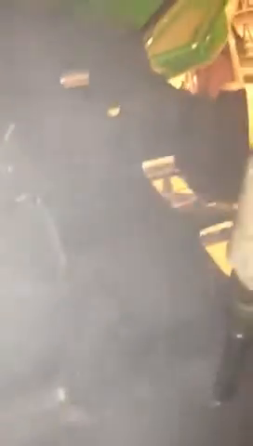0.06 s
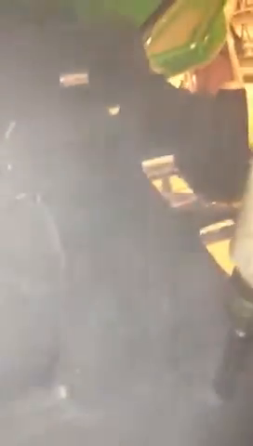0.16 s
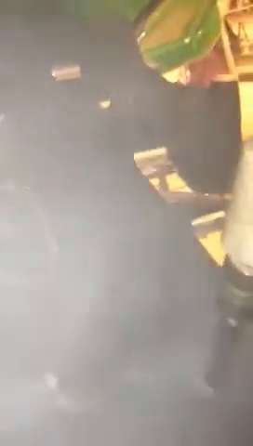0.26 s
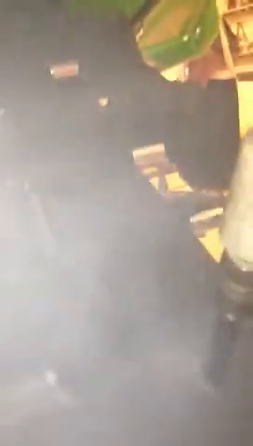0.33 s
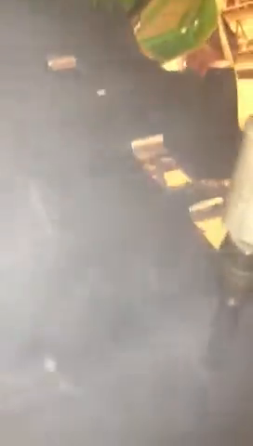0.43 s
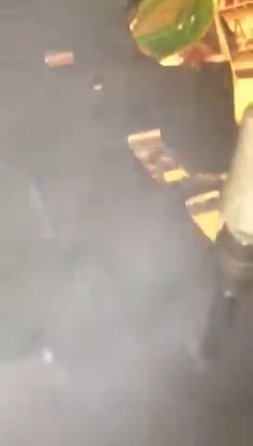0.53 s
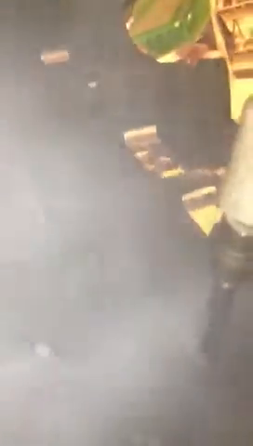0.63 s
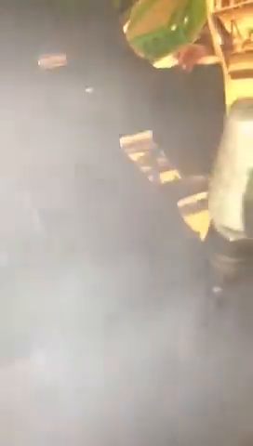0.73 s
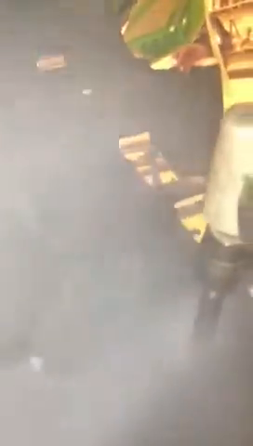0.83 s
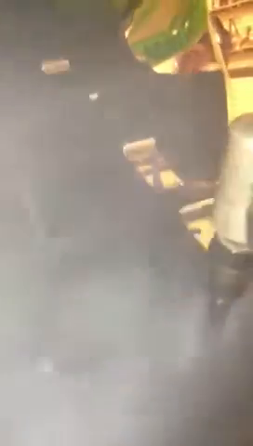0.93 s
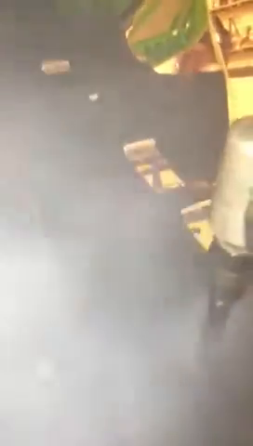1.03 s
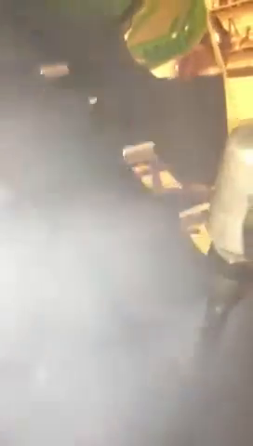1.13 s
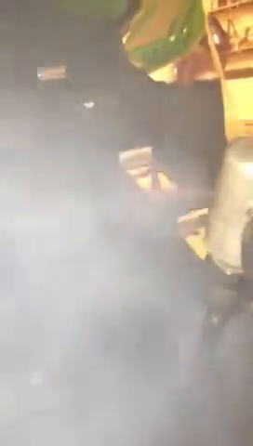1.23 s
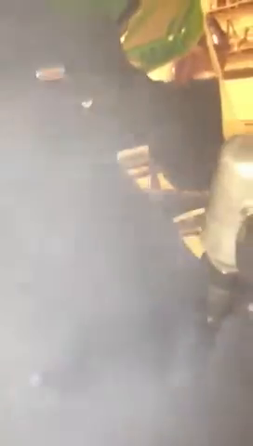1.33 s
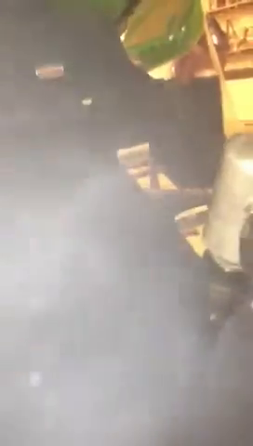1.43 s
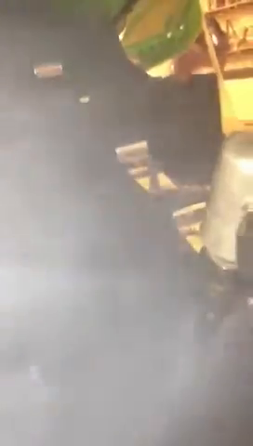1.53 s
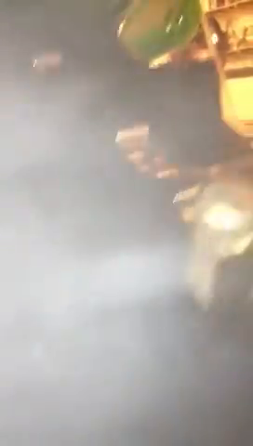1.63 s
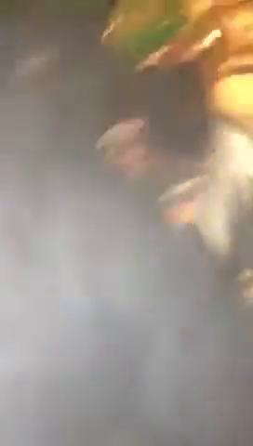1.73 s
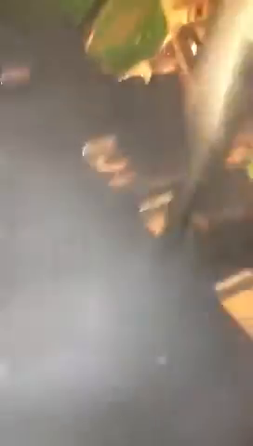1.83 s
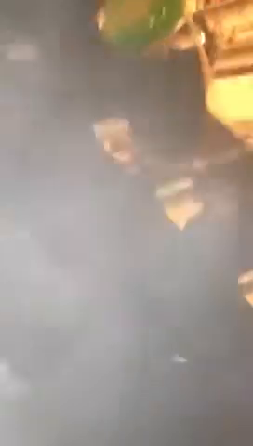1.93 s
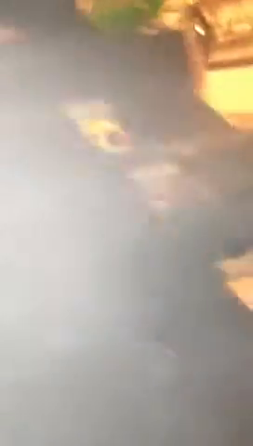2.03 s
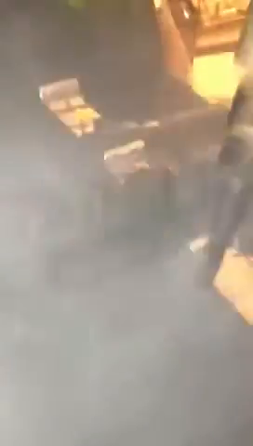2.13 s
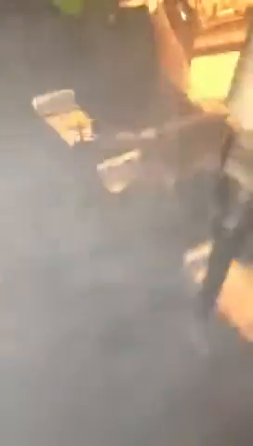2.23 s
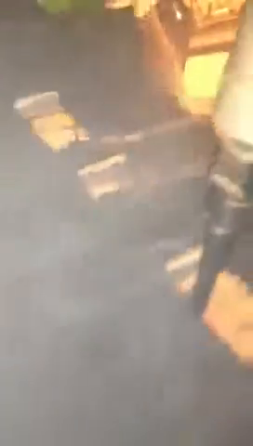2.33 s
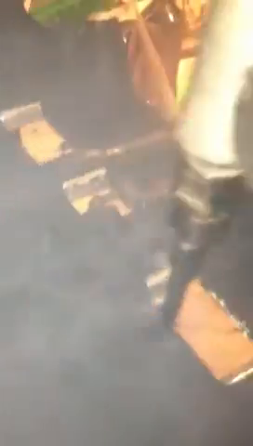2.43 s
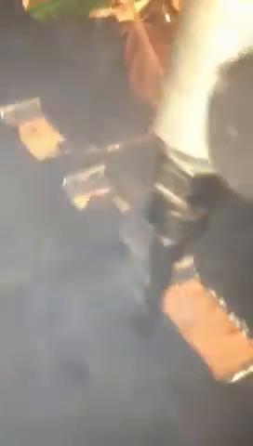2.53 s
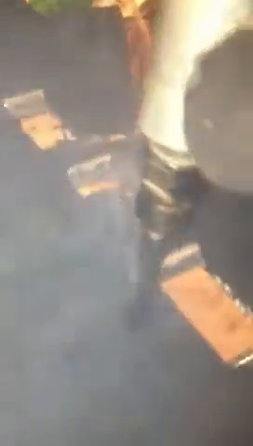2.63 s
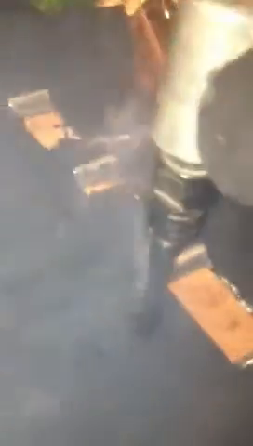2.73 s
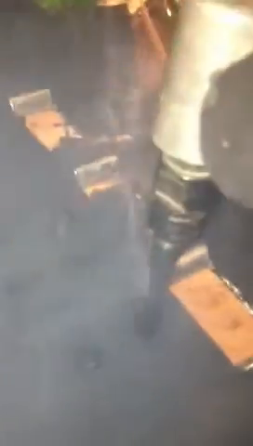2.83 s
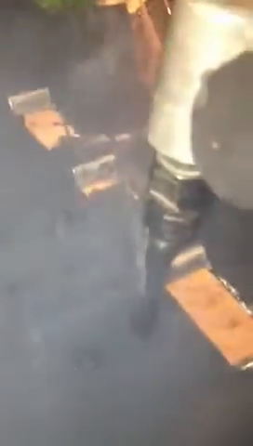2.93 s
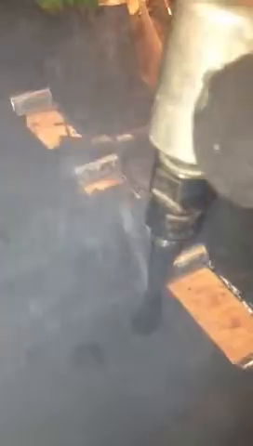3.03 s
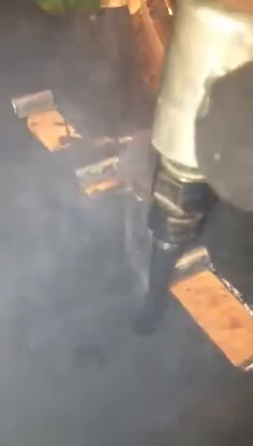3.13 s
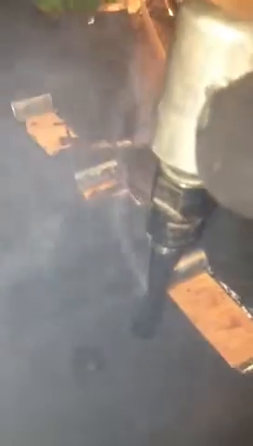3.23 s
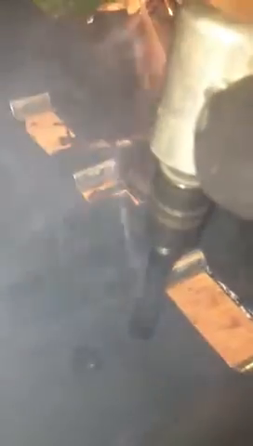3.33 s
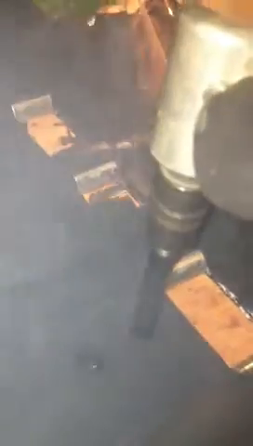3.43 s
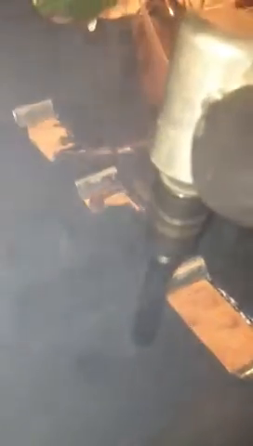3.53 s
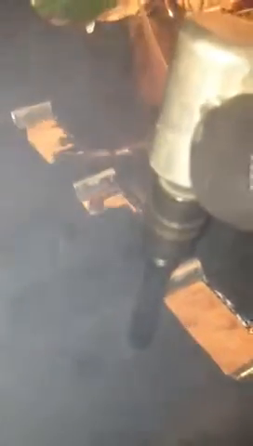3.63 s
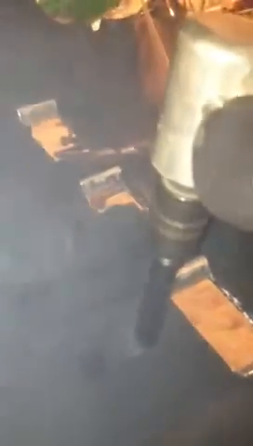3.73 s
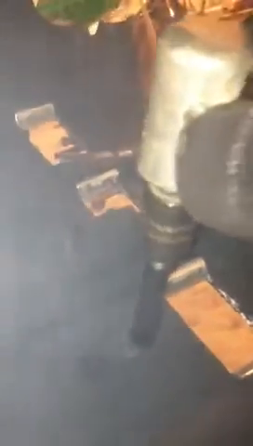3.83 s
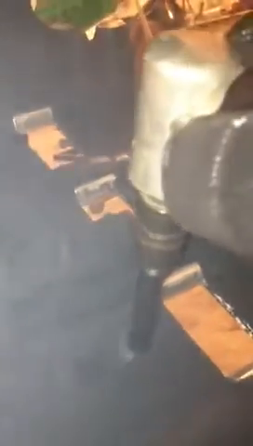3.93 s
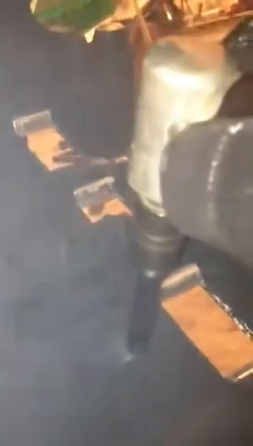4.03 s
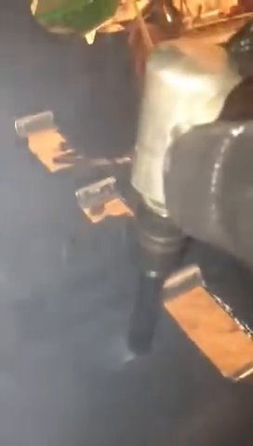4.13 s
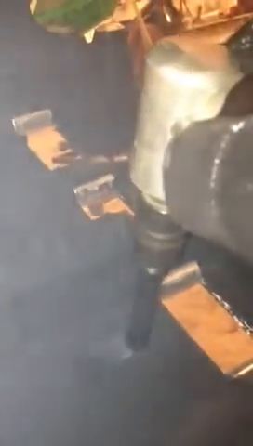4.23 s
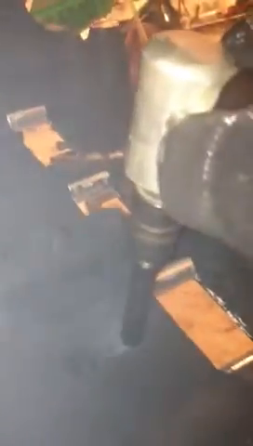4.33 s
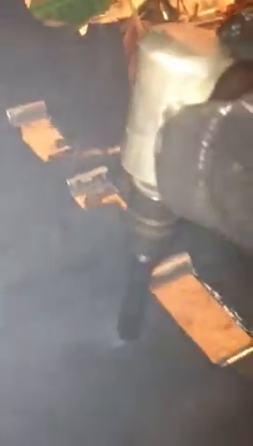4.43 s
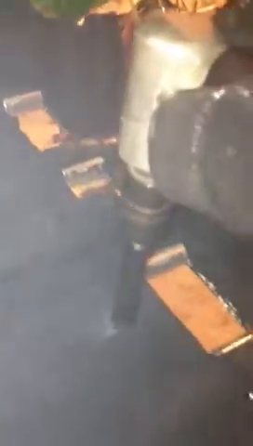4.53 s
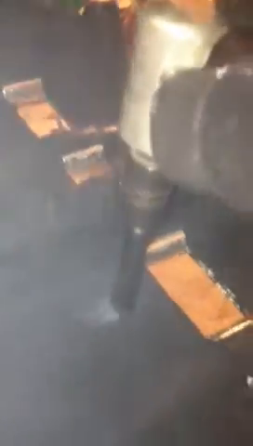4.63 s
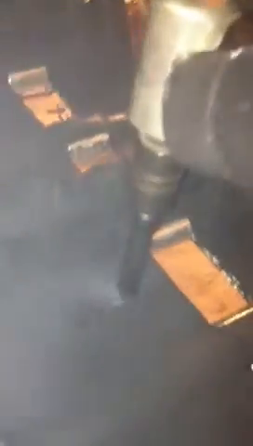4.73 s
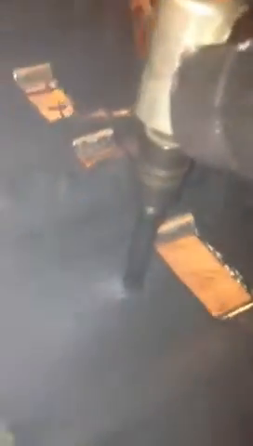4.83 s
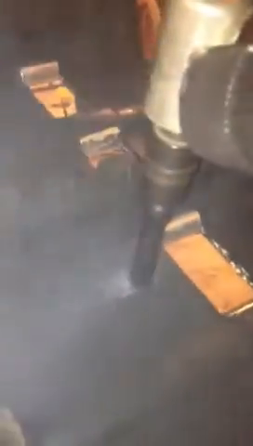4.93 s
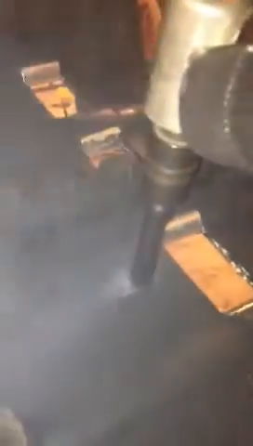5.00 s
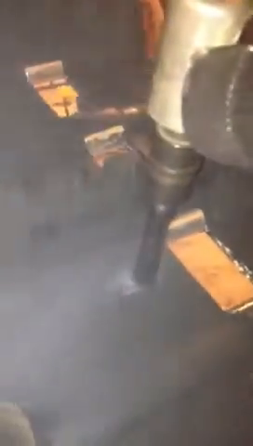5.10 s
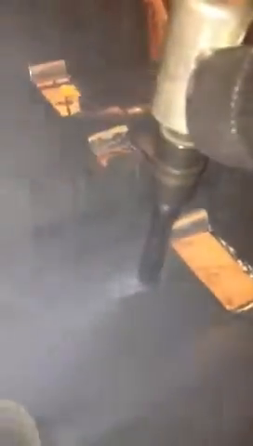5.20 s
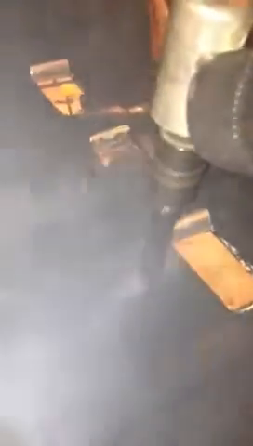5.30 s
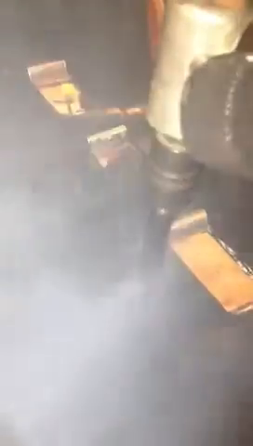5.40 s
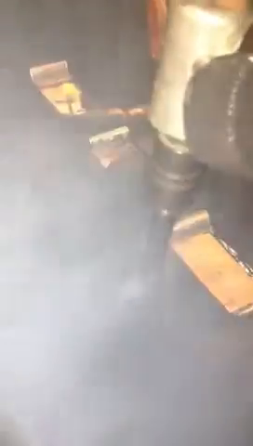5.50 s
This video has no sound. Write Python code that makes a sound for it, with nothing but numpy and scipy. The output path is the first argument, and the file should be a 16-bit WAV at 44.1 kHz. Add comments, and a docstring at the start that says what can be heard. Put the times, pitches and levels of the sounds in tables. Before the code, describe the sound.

Shrill pneumatic grinder boring rubber, its pitch dropping sharply when the bit grabs, pausing to reveal a distant steady compressor, then whining back up.

```python
"""Outdoors, close to a thick rubber track: an air grinder with a drill bit bores into it.
Each vane lets out a puff of air: a whine of rotor-locked sines at speed, a burble under load,
with filtered noise for the exhaust hiss. The rubber grabs the bit, it frees itself, stops, spins up again.
A piston compressor chugs steadily some way off: one repeating crank turn over a loose rattle and whistle."""
import sys
import numpy as np
from scipy import signal
from scipy.fft import rfft, irfft, next_fast_len
from scipy.io import wavfile
from scipy.ndimage import uniform_filter1d

SR = 44100
rng = np.random.default_rng(int(sys.argv[2]) if len(sys.argv) > 2 else 0)


def wav_record(signal):
    """Record a signal, one row per channel, as 16-bit PCM in the file named by sys.argv[1]."""
    frames = np.transpose(np.atleast_2d(signal))
    bounded = np.clip(frames, -1, 1)
    # unit amplitude maps onto the largest positive 16-bit level
    quanta = np.round(bounded * 32767).astype(np.int16)
    wavfile.write(sys.argv[1], SR, quanta)


N = 245195
TIME = np.arange(N) / SR

# the rubber grabs the bit: caught_s, slowing_s, creep_start_s, freed_s, run_up_s
GRABS = [(1.6, .0135, 1.66, 1.775, .012), (3.2, .0135, 3.34, 3.466, .026)]
# the trigger is let go and squeezed again
LET_GO_S, SQUEEZE_S = 1.825, 3.275
# how each sound dies once the air is shut off: (holds on s, then falls dB per s)
WHINE_FADE, ROAR_FADE, HISS_FADE, SIZZLE_FADE = (.05, 370), (.018, 112), (.0014, 203), (.02, 220)


def from_db(db):
    """Decibels to gain."""
    return 10 ** (np.asarray(db) / 20)


def rms_one(x):
    """Scale to unit power."""
    return x / np.sqrt(np.mean(x ** 2) + 1e-20)


def in_time(rows):
    """Each column of a curve at every sample."""
    s, *columns = np.transpose(rows)
    return [np.interp(TIME, s, column) for column in columns]


def at_hz(points, hz):
    """Gain of a spectrum at given frequencies; practically silent beyond its ends."""
    f, db = np.transpose(points)
    return from_db(np.interp(np.log(hz + 1e-3), np.log(f), db, left=-120, right=-120))


def coloured(x, gain_at):
    """Filter by a gain that is a function of frequency."""
    size = next_fast_len(N + 4096)
    hz = np.arange(size // 2 + 1) * SR / size
    return irfft(rfft(x, size) * gain_at(hz), size)[:N]


def noise(points):
    """Unit-power noise with the given spectrum."""
    return rms_one(coloured(rng.standard_normal(N), lambda hz: at_hz(points, hz)))


def drift(rate):
    """Random wander of unit power through `rate` new values per second."""
    steps = rng.standard_normal(4096)
    return rms_one(np.interp(TIME * rate, np.arange(len(steps)), steps))


def tone(phase, multiple):
    """A unit-power line locked to the rotor, at a multiple of the vane rate."""
    return np.sqrt(2) * np.sin(multiple * phase + rng.uniform(0, 2 * np.pi))


def smooth_step(at_s, width_s):
    """An S-shaped rise from 0 to 1 around a moment."""
    return .5 + .5 * np.tanh((TIME - at_s) / (2 * width_s))


def grip(grab):
    """How firmly one grab holds the bit, 0-1."""
    caught, slowing, _, freed, run_up = grab
    return smooth_step(caught, slowing) * (1 - smooth_step(freed, run_up))


def time_shut():
    """Seconds since the trigger was let go; 0 while it is squeezed."""
    return np.maximum(TIME - LET_GO_S, 0) * (TIME < SQUEEZE_S)


def valve(fade, attack_s=0.057):
    """Gain of an air-driven sound: it dies after the trigger is let go and builds up after the squeeze."""
    hold_s, fall_db_per_s = fade
    closing = from_db(-fall_db_per_s * np.maximum(time_shut() - hold_s, 0))
    opening = 1 - np.exp(-(np.maximum(TIME - SQUEEZE_S, 0) / attack_s) ** 1.55)
    return np.where(TIME < SQUEEZE_S, closing, opening)


def motor(crawl_start_hz=110.14, creep_hz_per_s=3000, coast_s=0.095):
    """Vane rate in Hz: cutting, dragged to a crawl by each grab, coasting down exponentially without air."""
    # speed while cutting, racing once freed, and cutting after the pause: time_s, vane_hz
    first_cut = [(0.0, 1310), (0.112, 1370), (0.182, 1420), (0.334, 1425), (0.498, 1380), (0.63, 1293),
                 (0.802, 1261), (1.098, 1250), (1.202, 1300), (1.302, 1352), (1.39, 1333), (1.45, 1298),
                 (1.502, 1246), (1.56, 1069)]
    race = [(1.82, 1400)]
    second_cut = [(3.57, 1522), (3.624, 1535), (3.856, 1479), (3.868, 1452), (3.962, 1366), (4.056, 1350),
                  (4.184, 1407), (4.272, 1423), (4.406, 1416), (4.632, 1372), (4.776, 1317), (4.86, 1293),
                  (5.008, 1309), (5.192, 1315), (5.364, 1166), (5.56, 1195)]
    vane_hz, = in_time(first_cut + race + second_cut)
    vane_hz = uniform_filter1d(vane_hz, size=1323)  # 30 ms
    for grab in GRABS:
        # a held rotor gains speed as the bit works loose
        creeping_s = np.maximum(TIME - grab[2], 0)
        crawl_hz = np.minimum(crawl_start_hz + creep_hz_per_s * creeping_s, vane_hz)
        vane_hz = vane_hz + (crawl_hz - vane_hz) * grip(grab)
    return vane_hz * np.exp(-time_shut() / coast_s)


def exhaust(level_db, held_db, fade):
    """Gain of one part of the jet: a held rotor lets less air through."""
    # exhaust air with the trigger held: time_s, level_db
    air_level = [(0, -20.5), (1.8, -21.5), (3.35, -19.5), (3.6, -19), (4.6, -18.5), (5.05, -21),
                 (5.56, -20.5)]
    air_db, = in_time(air_level)
    held = sum(grip(grab) for grab in GRABS)
    return from_db(air_db + level_db + held_db * held) * valve(fade)


def port_whine(vane_hz, waver_db=1.0):
    """(multiple, gain) of fundamental and octave, lifted or swallowed by the port as the motor slows."""
    # whine before and after the pause: time_s, fundamental_db, octave_db
    first_whine = [(0, -20, -18), (0.329, -20.5, -23.5), (.52, -24.5, -17), (.78, -20, -16.5),
                   (1.099, -23, -19.5), (1.44, -20.5, -18.5), (1.77, -20.5, -23), (1.82, -26, -33),
                   (1.86, -19.5, -16.5)]
    second_whine = [(3.45, -21.5, -15), (3.53, -26, -22), (3.58, -17.5, -20), (3.82, -18, -22.5),
                    (3.9, -29, -21.5), (3.97, -28.5, -18.5), (4.08, -38, -22), (4.13, -25, -21),
                    (4.2, -32, -28.5), (4.38, -27.5, -22.5), (4.53, -26.5, -35), (4.64, -22, -20.5),
                    (4.71, -35, -22), (4.77, -23.5, -19.5), (4.9, -20.5, -23), (5.22, -21.5, -21),
                    (5.36, -21.5, -15)]
    # port gain against speed: vane_hz, fundamental_db, octave_db
    slow_whine = [(135, -14, -22), (225, 1, -7.5), (316.5, -6, -1.5), (427, -6.5, 1), (550, 9.5, -11.5),
                  (694, 0, -9), (860, 4.5, -10.5), (1030, 0, 1.5), (1160, -0.5, 0.5)]
    rates, *lifts = np.transpose(slow_whine)
    partials = []
    for k, db, lift in zip((1, 2), in_time(first_whine + second_whine), lifts):
        level_db = db + np.interp(vane_hz, rates, lift) + waver_db * drift(14)
        partials.append((k, from_db(level_db) * valve(WHINE_FADE)))
    return partials


def swelling_whine(vane_hz, waver_db=2.5, second_hum_db=-2):
    """(multiple, gain) of spindle hum and upper partials, each swelling when the speed dwells near its own."""
    # multiples of the vane rate: hum, then upper partials
    swell_orders = [.2, 3, 5, 6]
    # where each one swells: vane_hz, half_width_hz, steepness, peak_db
    swells = [(1389.5, 82, 2.83, -30), (1065, 121, 1.21, -22.5), (1572, 111, 1.45, -21.5),
              (1387, 74, 2.2, -25.5)]
    dwell_hz = uniform_filter1d(vane_hz, size=5292)  # 120 ms
    partials = []
    for k, (best_hz, width_hz, steepness, db) in zip(swell_orders, swells):
        # the spindle hums less after the pause
        level_db = db + waver_db * drift(9) + second_hum_db * (k < 1) * (TIME > SQUEEZE_S)
        off_hz = np.maximum(np.abs(dwell_hz - best_hz), np.abs(vane_hz - best_hz))
        swell = 1 / np.hypot(1, (off_hz / width_hz) ** steepness)
        partials.append((k, from_db(level_db) * valve(HISS_FADE) * swell))
    return partials


def whine(vane_hz, phase, rough=0.12):
    """Sines locked to the rotor, each slightly rough in level."""
    partials = port_whine(vane_hz) + swelling_whine(vane_hz)
    return sum(gain * tone(phase, k) * (1 + rough * drift(70)) for k, gain in partials)


def gears(phase, waver_db=7.0, uneven_db=-54.0):
    """Faint wavering lines of uneven vanes, gears and bearings."""
    # multiple of the vane rate, level_db before the waver
    gear_lines = [(.4, -47), (.8, -43), (.85, -45), (1.2, -45), (1.4, -42), (1.5, -42), (1.6, -39),
                  (1.8, -39), (2.2, -39), (2.4, -39), (2.8, -44), (3.25, -44), (4, -38), (4.25, -42),
                  (5.5, -38), (5.75, -39), (7, -41), (8, -38), (9, -42), (10, -40), (11, -43)]
    lines = 0
    for k, db in gear_lines:
        level_db = db + waver_db * (np.tanh(drift(6)) - 0.6)
        lines = lines + from_db(level_db) * tone(phase, k)
    # four slightly unequal vanes put weak lines at every quarter of the vane rate
    uneven = sum(tone(phase, k / 4) * drift(5) for k in range(13, 44))
    return lines + from_db(uneven_db) * uneven


def slow_puffs(vane_hz, phase, pulsing, puff_db=-23.0, halves_db=-20.0, burble_db=-19.5):
    """Near the stall the puffs come apart and ring the tool body and port."""
    # resonances of tool body and port: frequency_hz, relative_db
    port = [(80, -40), (150, -12), (260, -9), (420, -21), (570, -5.5), (700, -15), (850, -4), (1050, -17),
            (1350, -11.5), (1700, -16), (2300, -12), (3300, -14), (4100, -30)]
    even = sum(at_hz(port, k * vane_hz) * tone(phase, k) for k in range(4, 13))
    # strong and weak puffs alternate, which adds lines halfway between
    halves = sum(at_hz(port, k * vane_hz) * tone(phase, k) for k in np.arange(1.5, 7))
    burble = from_db(burble_db) * noise(port) * pulsing
    return from_db(puff_db) * even + from_db(halves_db) * halves + burble


def jet(roar_gain):
    """Exhaust air as three bands of noise, each with its own response to load and trigger."""
    # colours of the exhaust: frequency_hz, relative_db
    roar_colour = [(80, -45), (150, -36), (300, -19.5), (800, -15.5), (1000, -15.5), (1300, 0), (1600, -8),
                   (1900, -0.5), (2250, 4), (2600, 1.5), (3000, 3.5), (3700, 0.5), (4100, -7.5),
                   (4600, -19)]
    hiss_colour = [(3700, -36), (4300, -14), (4600, -6.5), (5000, -7), (5900, -3.5), (6400, -3.5),
                   (7000, -2), (7700, 2.5), (8300, 1), (9200, -3), (9700, -6.5), (10500, -44)]
    sizzle_colour = [(8500, -39), (9600, -3.5), (10500, 0), (11400, -1.5), (13000, -1.5), (14500, 0),
                     (15300, -3), (17000, -26)]
    hiss = exhaust(0, -1.6, HISS_FADE) * noise(hiss_colour)
    sizzle = exhaust(-3.6, -3, SIZZLE_FADE) * noise(sizzle_colour)
    return roar_gain * noise(roar_colour) + hiss + sizzle


def nearby(x, low_cut_hz=203):
    """The small port radiates little bass; short echoes comb the spectrum, so gliding lines swell and fade."""
    # echoes off the track and the machine: delay_s, level_db
    echoes = [(.0023, -49), (.0051, -18), (.0094, -21.5), (0.0171, -14.5)]

    def comb(hz):
        return 1 + sum(from_db(db) * np.exp(-2j * np.pi * hz * s) for s, db in echoes)

    thin = signal.sosfilt(signal.butter(4, low_cut_hz, "high", fs=SR, output="sos"), x)
    return coloured(thin, comb)


def grinder(jitter=0.038, slow_hz=785.0, fast_hz=1150, chop=0.12, flutter_db=0.9):
    """Each vane lets out a puff of air: a whine at speed, a burble under load, always with jet noise."""
    vane_hz = motor()
    # the bit catches and slips in the rubber, so the rotation is never quite even
    wobble = jitter * (2 * drift(45) + drift(220))
    phase = 2 * np.pi * np.cumsum(vane_hz) / SR + wobble
    roar_gain = exhaust(-4, -2.6, ROAR_FADE)
    flow = roar_gain / np.percentile(roar_gain, 75)
    slow = 1 / (1 + (vane_hz / slow_hz) ** 6)
    fast = 1 / (1 + (fast_hz / vane_hz) ** 12)
    pulsing = 1 + chop * slow * np.cos(phase)
    lines = flow * fast * gears(phase)
    puffs = flow * slow * slow_puffs(vane_hz, phase, pulsing)
    air = jet(roar_gain) * pulsing * from_db(flutter_db * drift(70))
    return whine(vane_hz, phase) + nearby(lines + puffs + air)


def whistle(centre_hz=6050, half_width_hz=53, level_db=-56):
    """A thin, fluttering whistle: a narrow band of noise."""
    def peak(hz):
        return 1 / (1 + ((hz - centre_hz) / half_width_hz) ** 2)

    return from_db(level_db) * rms_one(coloured(rng.standard_normal(N), peak))


def compressor(crank_hz=29.37, rattle_db=-38.0, throb=0.37, loose_hz=3820.0):
    """Piston and valves sound at their own crank positions; the turn repeats as harmonics over a loose rattle."""
    # piston thump and two valve chatters per turn: lowest_hz, position_turns, length_s, half_turn_later_db
    stroke_table = [(20, 0.595, 0.0072, -3), (1300, 0.13, 0.0057, -6), (2570, 0.91, 0.0073, -5.5)]
    # colour of the repeating turn, low and high: frequency_hz, relative_db per harmonic
    body = [(29, -103), (60, -87), (118, -57.5), (150, -47.5), (235, -58), (310, -46), (410, -64),
            (520, -54.5), (585, -47.5), (700, -62), (800, -44.5), (900, -53.5), (1050, -57), (1200, -57)]
    clatter = [(1380, -57), (1560, -81), (1650, -49.5), (1900, -64), (2200, -78), (2950, -80),
               (3230, -55.5), (3600, -59.5), (4200, -81), (5500, -60), (8000, -73), (10000, -79),
               (11500, -77), (15000, -78)]
    # strongest tones: multiple of the crank rate, relative_db
    strong_tones = [(9, -39), (16, -50), (19, -42), (23, -44), (26, -43), (28, -46), (205, -57)]
    # loose rattle: frequency_hz, relative_db
    rattle_colour = [(25, -38), (60, -33), (90, -20), (190, 3), (300, -3), (430, -10), (650, 3.5), (850, 0),
                     (1200, -13), (1700, -2.5), (2500, -11), (3400, -9), (4300, -15.5), (6000, -13),
                     (10000, -22), (15000, -19)]
    # level at the microphone, which comes up while the grinder pauses: time_s, level_db
    heard_level = [(0, -7), (1.5, -6.5), (2.1, -4), (2.4, -2), (2.7, 0), (3.0, 0.6), (3.3, 1.5),
                   (3.6, -5.5), (5.56, -8)]
    size = round(SR / crank_hz)
    turn = np.arange(size) / size
    hz = np.arange(size // 2 + 1) * crank_hz
    lines, strokes = np.zeros(len(hz), complex), 0
    for low_hz, position, length_s, return_db in stroke_table:
        # distance smears each knock into a short swell
        away_s = ((turn - position + .5) % 1 - .5) / crank_hz
        swell = np.exp(-(away_s / length_s) ** 2)
        swell = swell + from_db(return_db) * np.roll(swell, size // 2)
        # each stroke sets the harmonic phases above its lowest frequency
        lines = np.where(hz > low_hz, rfft(swell * rng.standard_normal(size)), lines)
        strokes = strokes + swell
    # the repeating part fades above loose_hz, except in the strongest tones
    gains = at_hz(body + clatter, hz) / np.hypot(1, (hz / loose_hz) ** 4)
    for multiple, db in strong_tones:
        gains[multiple] = from_db(db)
    cycle = irfft(gains * np.exp(1j * np.angle(lines)), size) * size / np.sqrt(2)
    angle = TIME * crank_hz % 1
    chug = np.interp(angle, turn, cycle, period=1)
    # the rattle throbs with the strokes
    beat = 1 - throb + throb * np.interp(angle, turn, rms_one(strokes))
    rattle = from_db(rattle_db) * noise(rattle_colour) * beat
    level_db, = in_time(heard_level)
    return from_db(level_db) * (chug + rattle + whistle())


def scene():
    """Tool and compressor reach one microphone, alike in both channels."""
    return np.tile(grinder() + compressor(), (2, 1))


def record(dry, rounding_level=1.03, cutoff_hz=15330):
    """The highest peaks are rounded a little; the top is cut steeply."""
    rounded = dry / (1 + np.abs(dry / rounding_level) ** 4) ** .5

    def top_cut(hz):
        return 1 / np.hypot(1, (hz / cutoff_hz) ** 200)

    return np.array([coloured(x, top_cut) for x in rounded])


dry = scene()
out = record(dry)
wav_record(out)
```